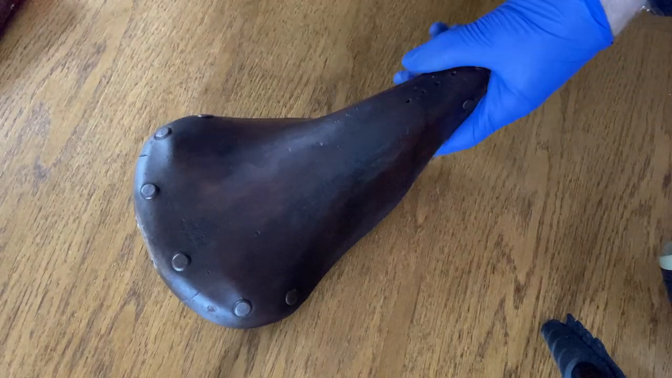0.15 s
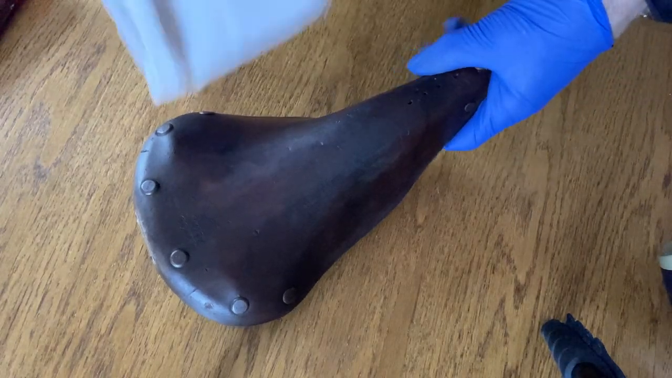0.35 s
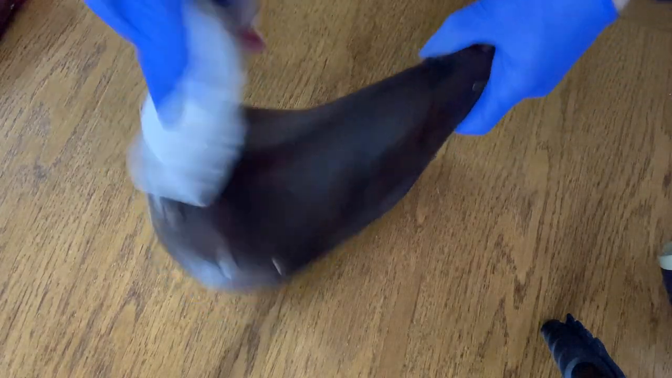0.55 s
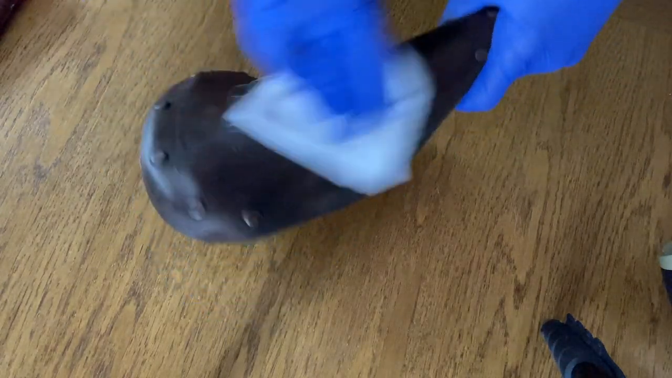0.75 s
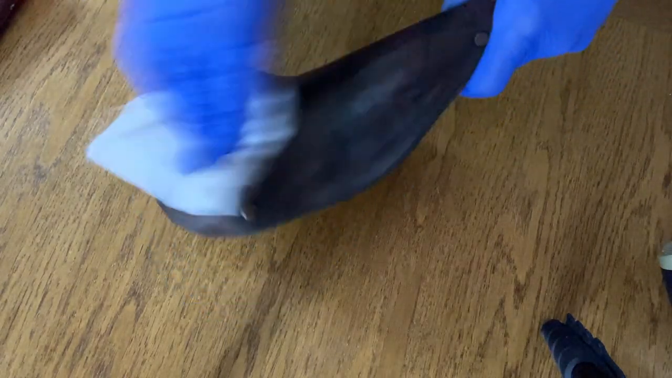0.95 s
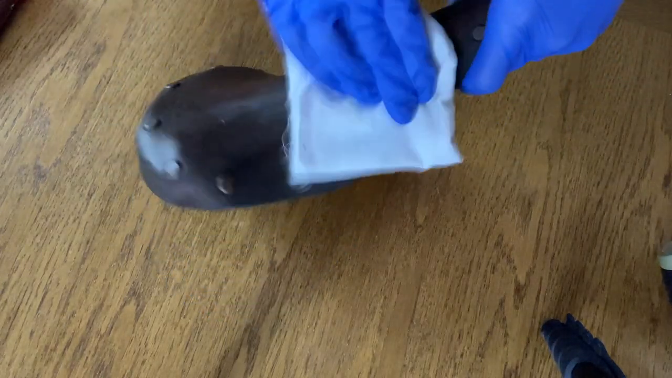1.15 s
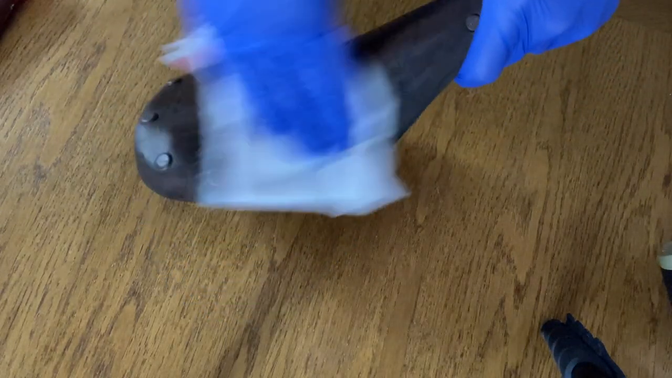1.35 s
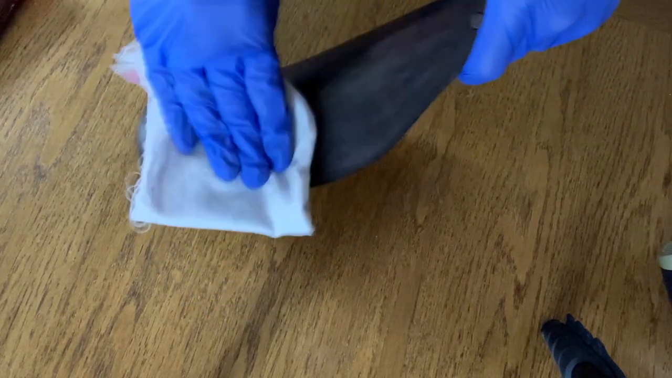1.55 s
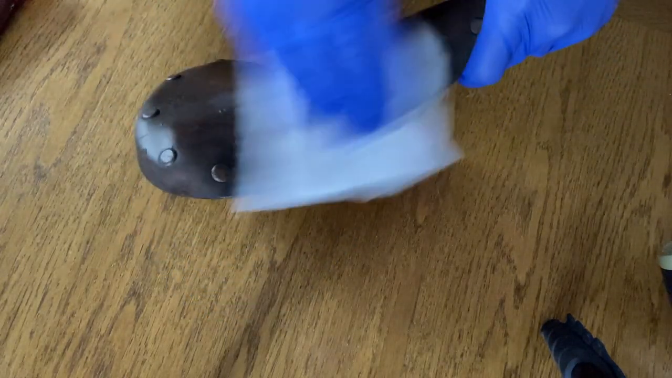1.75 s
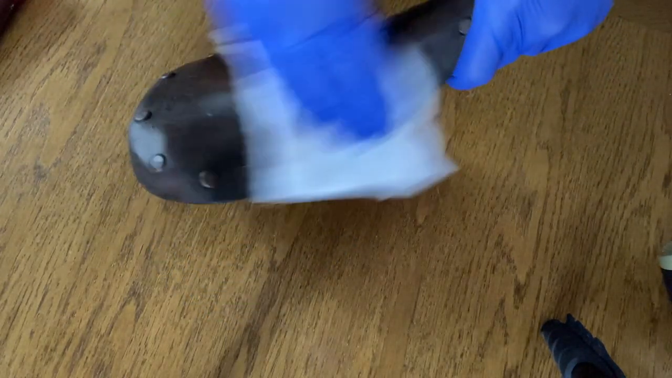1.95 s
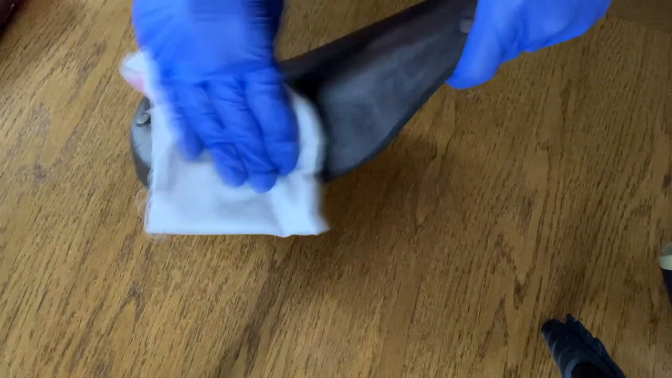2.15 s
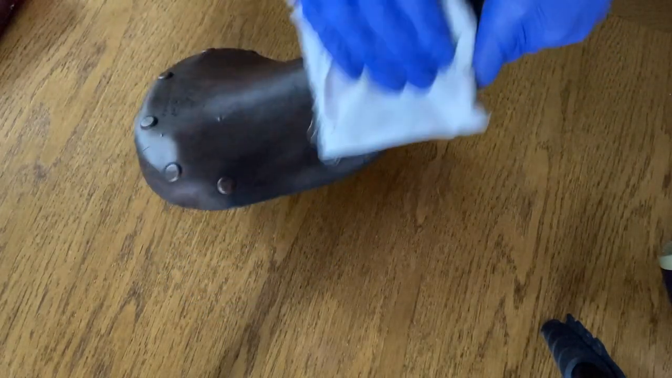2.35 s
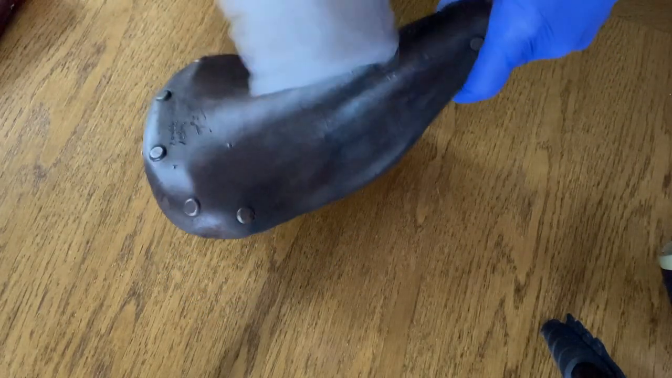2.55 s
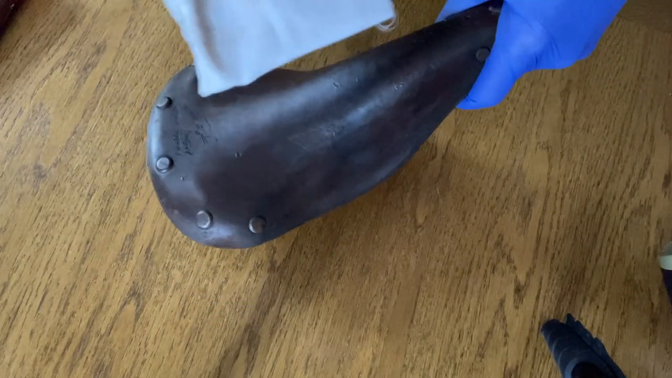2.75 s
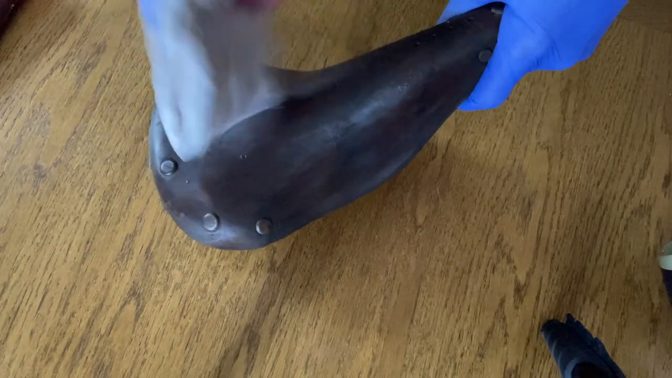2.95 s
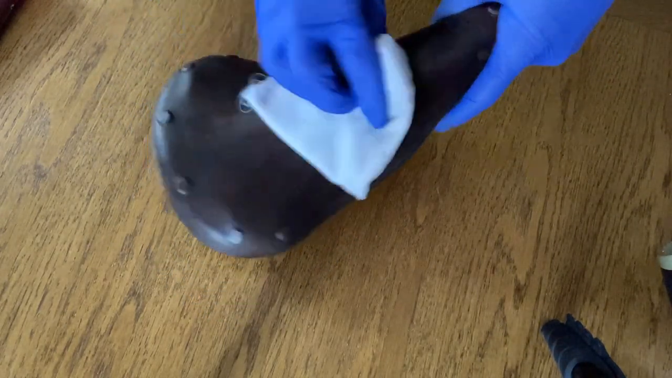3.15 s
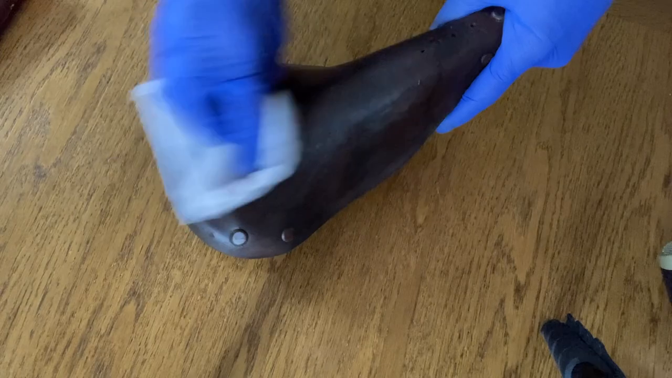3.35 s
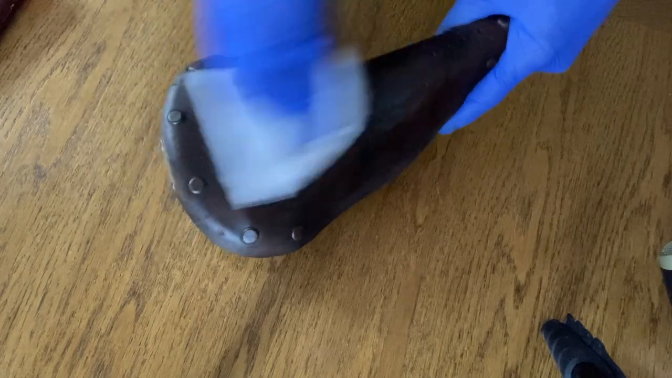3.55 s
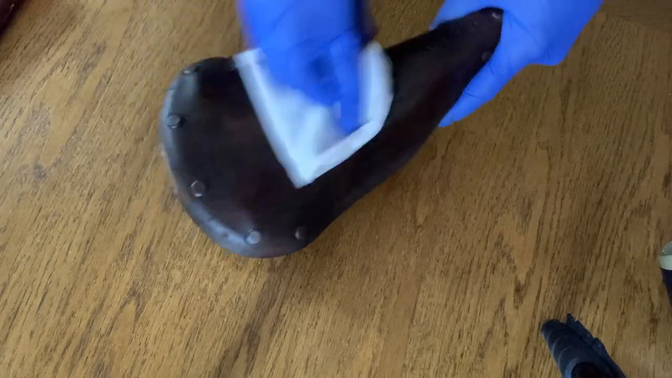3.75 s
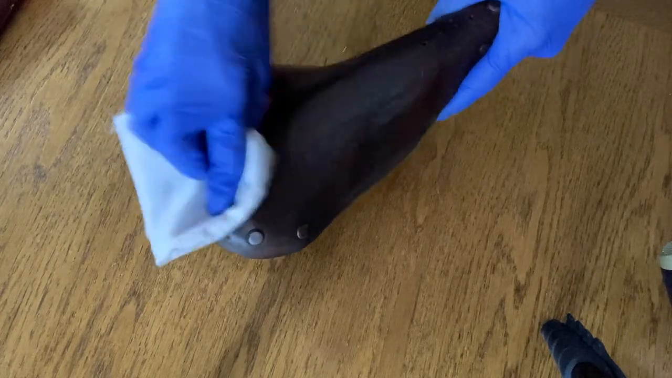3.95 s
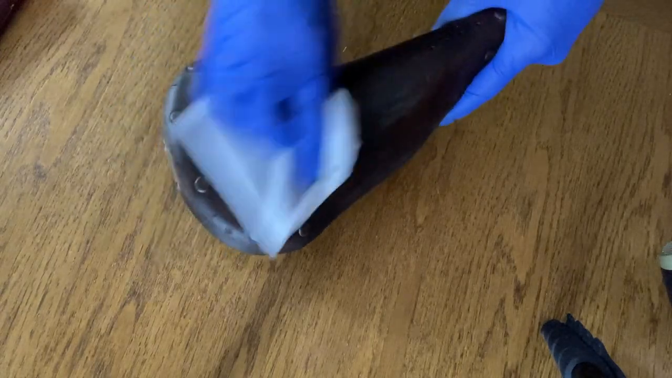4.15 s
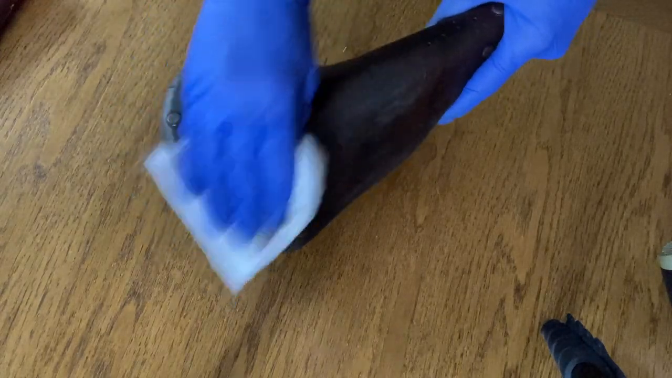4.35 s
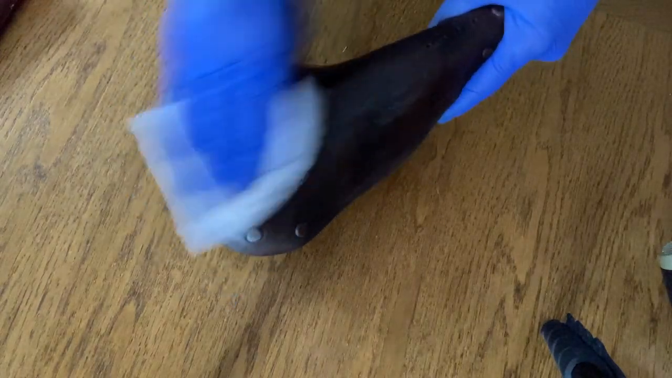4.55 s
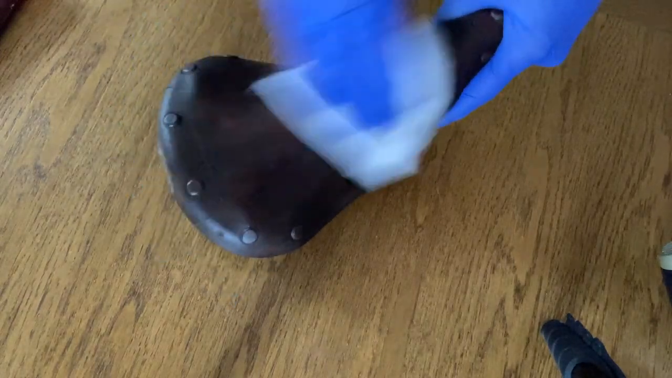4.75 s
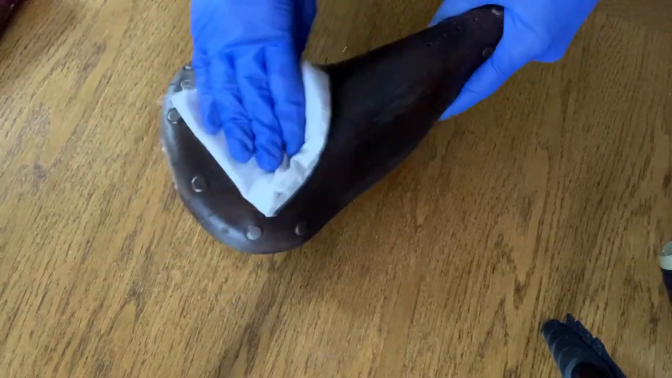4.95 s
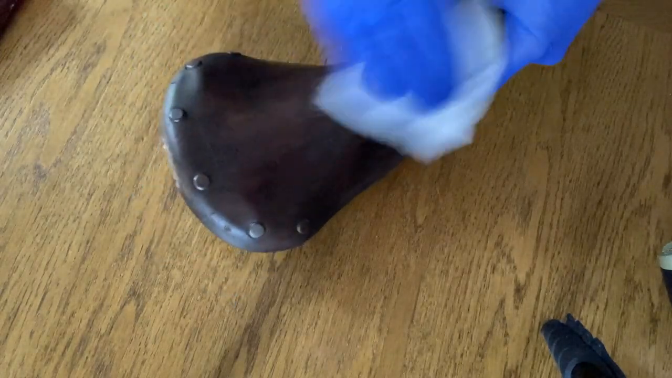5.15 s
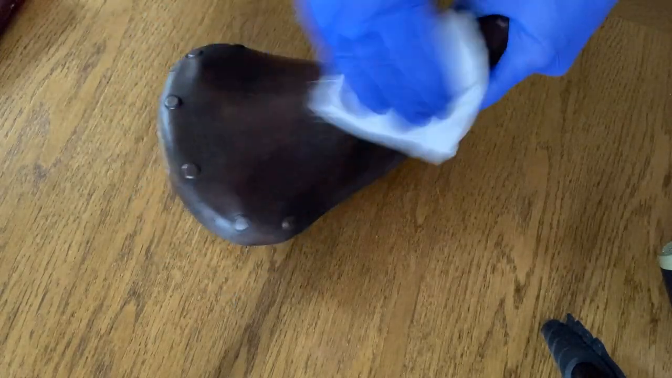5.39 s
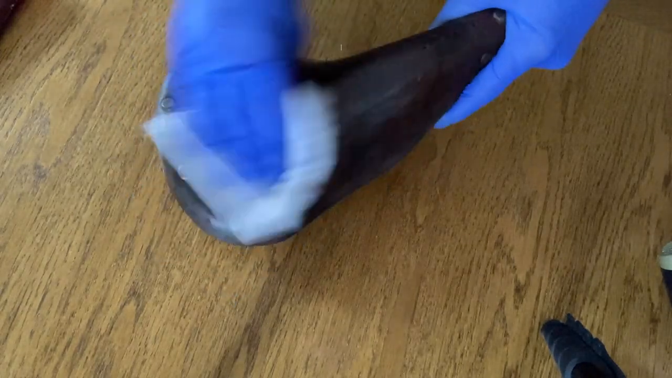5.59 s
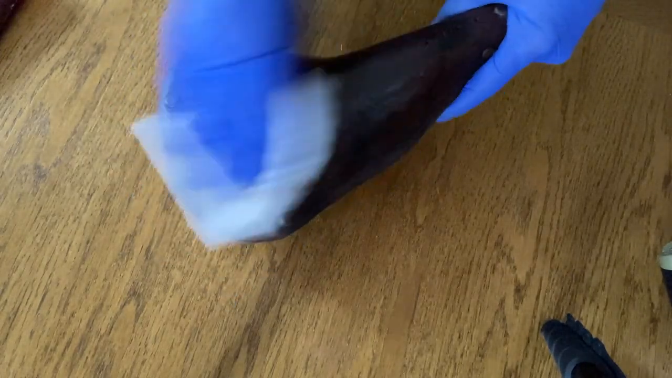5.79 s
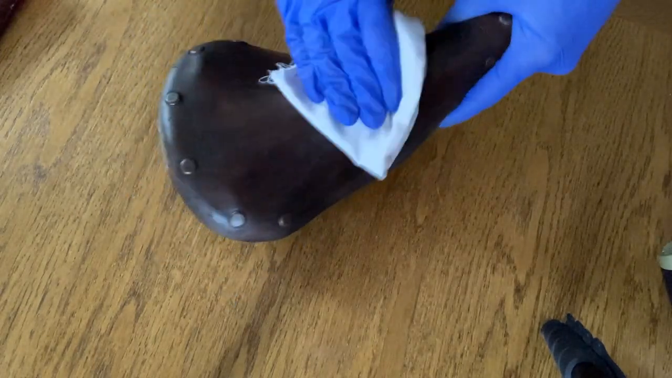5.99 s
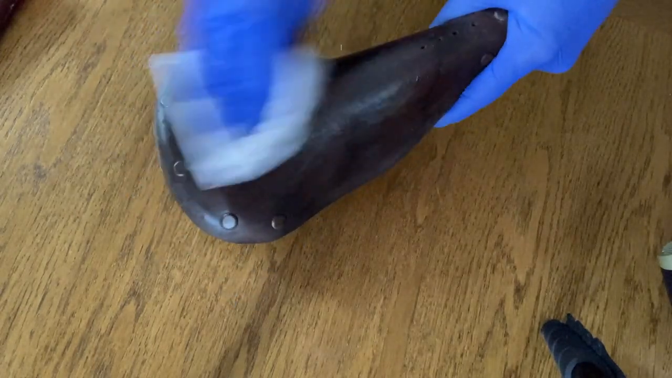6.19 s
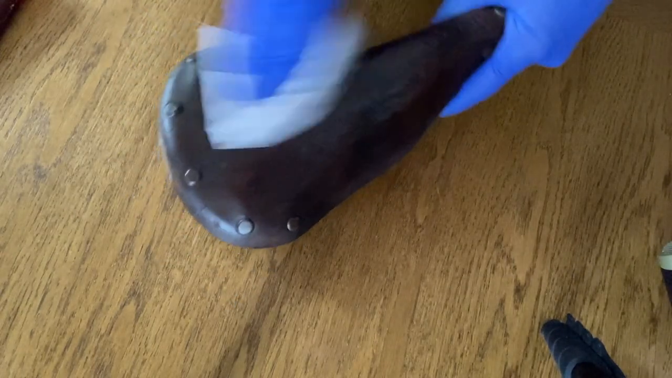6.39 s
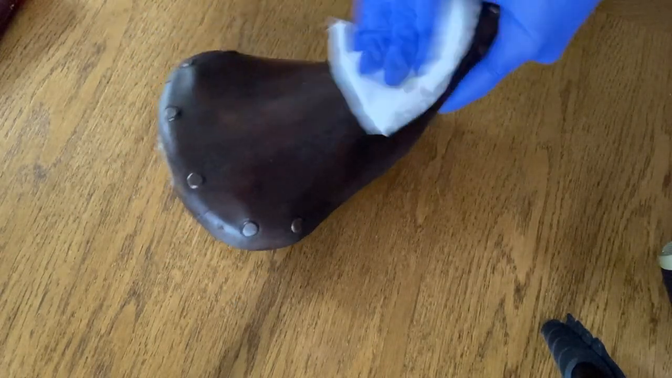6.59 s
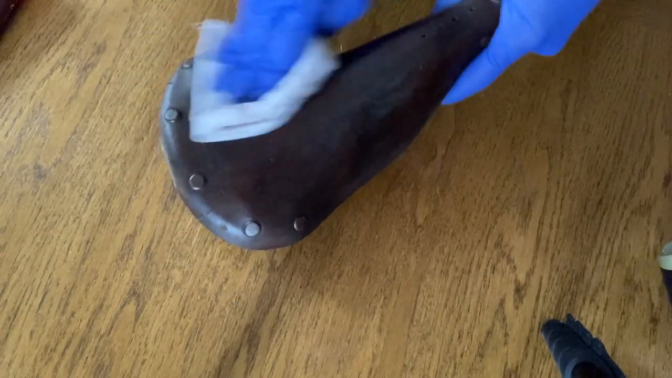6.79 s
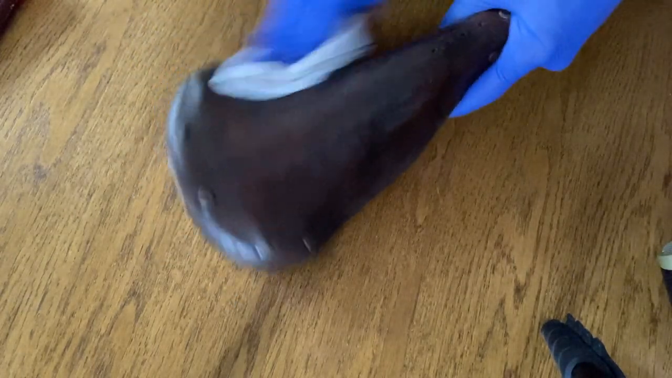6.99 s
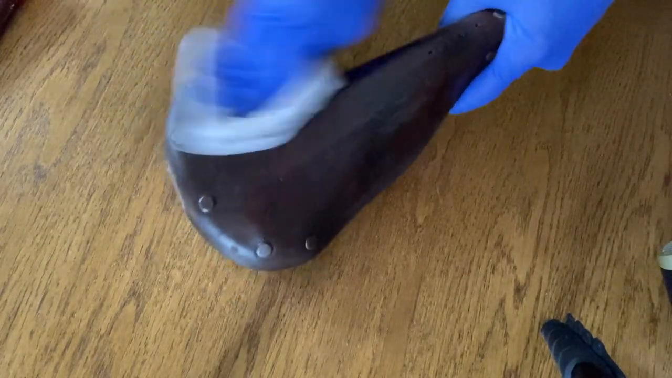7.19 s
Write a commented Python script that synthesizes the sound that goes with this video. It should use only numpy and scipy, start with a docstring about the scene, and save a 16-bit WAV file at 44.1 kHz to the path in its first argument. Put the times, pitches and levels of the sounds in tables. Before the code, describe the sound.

A cloth rubs a leather bicycle saddle in quick, close strokes while the saddle knocks now and then on a wooden table.

```python
"""Buffing a leather saddle.

A gloved hand rubs a bicycle saddle with a cloth, close by, about seven strokes a second.
Fibres hiss, threads rasp and the weave whirs up and down with each stroke; the leather creaks
at first contact. The saddle rocks, knocks and skids on a wooden table, its frame humming,
in a small quiet room."""
import sys
import numpy as np
from scipy import signal
from scipy.fft import rfft, irfft, next_fast_len
from scipy.io import wavfile
from scipy.ndimage import uniform_filter1d, map_coordinates

SR = 44100
rng = np.random.default_rng(int(sys.argv[2]) if len(sys.argv) > 2 else 0)


def inscribe(sig):
    """Save sig as 16-bit PCM at rate SR to the path in sys.argv[1].

    A 1-D sig is mono; a 2-D sig holds one channel per row.
    Samples are clipped to [-1, 1] before scaling.
    """
    pcm = np.round(np.clip(np.atleast_2d(sig).T, -1, 1) * 32767)
    wavfile.write(sys.argv[1], SR, pcm.astype(np.int16))


N = 318843
TIME_S = np.arange(N) / SR


def amp(db):
    """Decibels to gain."""
    return 10 ** (np.asarray(db) / 20)


def unit(x):
    """Scale to rms 1."""
    return x / np.sqrt(np.mean(x ** 2) + 1e-20)


def along(points, hz):
    """Interpolate (frequency [Hz], value) points on a log axis."""
    knots_hz, values = np.transpose(points)
    return np.interp(np.log(hz + 1), np.log(knots_hz + 1), values)


def wobble(rate_hz):
    """Smooth random curve, rms about 1."""
    knots = rng.standard_normal(int(N * rate_hz / SR) + 4)
    return map_coordinates(knots, [TIME_S * rate_hz])


def filtered(x, response):
    """Apply a frequency response."""
    size = next_fast_len(N + SR // 2)
    return irfft(rfft(x, size) * response(np.fft.rfftfreq(size, 1 / SR)), size)[..., :N]


def noise(spectrum):
    """Two independent noises of one spectrum."""
    return unit(filtered(rng.standard_normal((2, N)), lambda hz: amp(along(spectrum, hz))))


def add(track, start_s, sound):
    """Mix a sound into a track."""
    part = track[..., max(0, round(start_s * SR)):][..., :sound.shape[-1]]
    part += sound[..., :part.shape[-1]]


# Stereo width: (frequency [Hz], side gain [dB])
SIDE_GAIN = [(40, 13.5), (100, -5), (300, -6.5), (550, -1.5), (1100, -7.5), (2200, -5.5), (4200, -1.5),
             (6500, -17.5), (10000, -97)]

def spread(pair):
    """Two signals to left and right: wide in the bass and mids, centred in the high treble."""
    side = filtered(pair[1], lambda hz: amp(along(SIDE_GAIN, hz)))
    return np.array([pair[0] + side, pair[0] - side])


# Room tone: (frequency [Hz], relative level [dB])
ROOM_TONE_SPECTRUM = [(25, -18), (50, -11.5), (120, -5.5), (250, -25), (500, -29), (1500, -26.5),
                      (15000, -35.5)]

def room_tone(level_db=-77.5):
    """Faint steady background, mostly bass."""
    return amp(level_db) * spread(noise(ROOM_TONE_SPECTRUM))


# Leather resonances: (frequency [Hz], bandwidth [Hz], gain [dB])
SHELL_MODES = [(722, 65, 13), (1118, 217, 3), (1766, 53, 4.5), (3480, 640, -15), (4400, 150, -11)]

def shell(hz):
    """Response of the hollow leather shell."""
    return sum((-1) ** k * amp(db) * 1j * hz * width_hz / (mode_hz ** 2 - hz ** 2 + 1j * hz * width_hz)
               for k, (mode_hz, width_hz, db) in enumerate(SHELL_MODES))


# Drags and flicks of the cloth: (start [s], end [s], relative level [dB])
CLOTH_DRAGS = [(0, 0.025, -51), (0.097, .5, -68.5), (.34, .44, -64), (.53, .6, -62), (0.531, .55, -55),
               (0.594, 0.707, -56.5), (0.658, 0.673, -50.5), (2.363, 2.51, -60), (2.89, 3.06, -64.5),
               (2.989, 3.018, -62), (6.777, 7.23, -57)]
# Rustle: (frequency [Hz], relative level [dB])
RUSTLE_SPECTRUM = [(60, -3), (200, 3), (500, 4), (800, -6.5), (1200, -1.5), (1800, 1.5), (3000, -3),
                   (4200, -2), (9000, -1.5), (15500, -7)]

def loose_cloth(rise_db_per_s=124, fall_db_per_s=86, flick_s=.025, bright_db=-62, dull_hz=2300):
    """Cloth dragged without pressure rustles: each drag swells, holds and fades, duller when faint."""
    drags_db = []
    for start, end, db in CLOTH_DRAGS:
        briskness = 4 if end - start < flick_s else 1
        down_db = np.maximum(rise_db_per_s * (start - TIME_S), fall_db_per_s * (TIME_S - end))
        drags_db.append(db - briskness * np.maximum(down_db, 0))
    envelope_db = np.max(drags_db, axis=0)
    rustle = filtered(spread(noise(RUSTLE_SPECTRUM)), lambda hz: 1 + np.abs(shell(hz)))
    dull = filtered(rustle, lambda hz: 1 / (1 + (hz / dull_hz) ** 2))
    brightness = np.clip(amp(envelope_db - bright_db), 0, 1)
    return amp(envelope_db - 2 + 1.4 * wobble(120)) * (dull + brightness * (rustle - dull))


# Saddle bumps the table; the faint, long-ringing 0.575 s row is the frame humming under the rubbing: (time [s],
# relative level [dB], pitch [Hz], relative ring [dB])
BUMPS = [(0.347, -38.5, 191, -15), (.575, -50.5, 134, 8.5), (.636, -39.5, 135, -4), (.667, -39, 146, -3.5),
         (1.122, -33, 128, -1.5), (1.333, -28.5, 255, -31), (1.353, -21.5, 145, -11),
         (1.617, -36.5, 125, -11), (2.123, -49, 163, -2), (2.501, -46, 180, -9), (3.078, -29.5, 164, -11),
         (3.209, -18, 222.5, -12), (3.244, -32, 180, -13), (4.275, -32.5, 190, -18),
         (4.281, -38.5, 82.6, -16), (5.82, -40, 180, -12.5), (6.709, -38, 438, -9.5),
         (7.012, -30.5, 231, -12)]
# Tipped by a hard push, the saddle drops back on its rails: (time [s], relative level [dB])
DROPS = [(4.803, -24), (5.104, -26.5)]
# One drop: (delay [s], relative level [dB], pitch [Hz], relative ring [dB])
DROP_CONTACTS = [(0, -1, 714, -10.5), (.014, -2.5, 208, -11), (.023, -6.5, 106, -9),
                 (.026, -3.5, 222.2, -9.5)]

def contacts(clack_lead_s=.00202, clack_hz=560, clack_ring_db=-12):
    """All saddle-table contacts, as BUMPS rows; a clack leads each bump, far louder on hard ones."""
    clacks = [(s - clack_lead_s, 3.5 + 1.55 * db, clack_hz, clack_ring_db) for s, db, _, _ in BUMPS]
    drops = [(s + delay_s, db + contact_db, pitch_hz, ring_db)
             for s, db in DROPS for delay_s, contact_db, pitch_hz, ring_db in DROP_CONTACTS]
    return BUMPS + clacks + drops


# Saddle frame and table together: (frequency [Hz], relative level [dB], t60 [s])
FRAME_MODES = [(101, -1, 0.086), (133.6, 2, 0.55), (163.8, 0, 0.26), (206.7, -6.5, 0.5),
               (263.4, 7.5, 0.081), (283.3, -1.5, 0.27), (314, -1, 0.14), (336.4, -2.5, 0.39),
               (405, -11.5, 0.36), (524, -11, 0.45), (640, -17, 0.13), (744, 0.5, 0.096), (980, -17, 0.5),
               (1173, -5, 0.23)]

def knocks(t60_cycles=9, reach_octaves=.61, rattle_db=-15, rattle_t60_s=.13):
    """Each contact thuds and rattles; soft ones wake the low frame modes, hard ones the high."""
    track, t = np.zeros(N), np.arange(SR * 3 // 4) / SR
    mode_hz, mode_db, t60_s = np.transpose(FRAME_MODES)[:, :, None]
    for s, db, pitch_hz, ring_db in contacts():
        attack = 1 - np.exp(-t * pitch_hz * 1.88)
        thud = 1.28 * amp(-60 * t * pitch_hz / t60_cycles) * np.sin(2 * np.pi * pitch_hz * t)
        detuning = np.log2(mode_hz / pitch_hz) / reach_octaves
        drive = amp(mode_db + rng.normal(0, .52, mode_hz.shape)) / (1 + detuning ** 2) ** 1.63
        hum = np.sum(drive * amp(-60 * t / t60_s) * np.sin(2 * np.pi * mode_hz * t), axis=0)
        lowpass = signal.butter(3, min(2.2 * pitch_hz, 1500), fs=SR, output="sos")
        rattle = unit(signal.sosfilt(lowpass, rng.standard_normal(len(t))))
        rattle *= amp(rattle_db - 60 * t / rattle_t60_s)
        add(track, s, amp(db) * attack * (thud + amp(ring_db - 2) * hum + rattle))
    # The table top is too small to radiate deep bass.
    return signal.sosfilt(signal.butter(2, 70, "high", fs=SR, output="sos"), track)


# Leather catches and lets go: (time [s], relative level [dB])
LEATHER_SLIPS = [(.414, -55), (.4405, -49.5), (.4625, -52), (.5065, -49.5), (.552, -49.5), (1.8545, -47),
                 (2.118, -43.5), (3.967, -45), (4.0992, -44), (5.4145, -46)]

def creaks(attack_s=.00079, t60_s=.04, scrape_db=-11, scrape_hz=4500):
    """Each slip is a short scrape that rings the leather shell."""
    track, t = np.zeros((2, N)), np.arange(SR // 10) / SR
    for s, db in LEATHER_SLIPS:
        envelope = amp(db + 12 - 60 * t / t60_s) * (1 - np.exp(-t / attack_s))
        add(track, s, envelope * rng.standard_normal((2, len(t))))
    return spread(filtered(track, lambda hz: shell(hz) + amp(scrape_db) / (1 + 1j * hz / scrape_hz) ** 2))


# Even strokes until the next row, 0 for a pause: (start [s], strokes [count])
STROKE_RUNS = [(.68, 4), (1.27, 6), (2.135, 1), (2.352, 0), (3.035, 1), (3.16, 4), (3.778, 2), (4.095, 1),
               (4.3, 2), (4.626, 1), (4.812, 8), (5.988, 5), (6.758, 1), (6.912, 2), (7.3, 0)]

def hand(usual_stroke_s=.148, skew=.93):
    """Pendulum motion: swing (peak 1 per stroke), speed (peak 1 if usual), direction (push 1, pull -1)."""
    swing, speed, direction = np.zeros((3, N))
    sign = -1
    for (first, strokes), (last, _) in zip(STROKE_RUNS, STROKE_RUNS[1:]):
        turns_s = np.linspace(first, last, round(strokes) + 1)
        for start, end in zip(turns_s, turns_s[1:]):
            sign = -sign
            now = (TIME_S >= start) & (TIME_S < end)
            progress = (TIME_S[now] - start) / (end - start)
            swing[now] = np.abs(np.sin(np.pi * progress ** skew))
            speed[now] = swing[now] * usual_stroke_s / (end - start)
            direction[now] = sign
    return swing, speed, direction


# Firmness of the rub: (time [s], relative pressure [dB], relative rasp level [dB])
HAND_EFFORT = [(0.74, -59.5, -61), (0.9, -52.5, -55), (1.5, -52.5, -51.5), (2.07, -51, -49.8),
               (2.25, -56, -54), (3.1, -55, -57), (3.55, -51.5, -53.5), (4.2, -55.5, -58),
               (4.55, -54.5, -58), (4.72, -49.5, -50.5), (5.35, -50.5, -50.5), (5.85, -49.5, -48),
               (6.2, -52.5, -53.0), (6.68, -51.0, -52.7), (6.85, -56.5, -58), (7.2, -58, -62.5)]

def pressing(direction, weave_follow=.12, push_db=.88):
    """Gains of hiss, rasp and weave under the hand's pressure; the weave bites harder on the push."""
    times_s, *columns = np.transpose(HAND_EFFORT)
    pressure_db, rasp_db = (np.interp(TIME_S, times_s, column) for column in columns)
    weave_db = -53 + weave_follow * (pressure_db - pressure_db.mean()) + push_db * direction
    gains = amp([pressure_db, rasp_db, weave_db]) * np.abs(direction)
    return uniform_filter1d(gains, SR // 30, axis=1)


# Weave roughness at mid-stroke pace: (frequency [Hz], relative level [dB])
WEAVE_SPECTRUM = [(100, -26), (300, -7), (600, -6.5), (1100, 2.5), (1600, 0), (2000, -1.5), (2600, 2),
                  (4000, -10), (8000, -59)]
# Saddle body response: (frequency [Hz], relative gain [dB])
BODY_RESPONSE = [(60, -22), (140, 16), (300, 3), (450, -8), (600, -5.5), (730, -3), (880, -8), (1300, -2.5),
                 (1700, -1), (2400, -7), (6000, -41)]

def weave(swing, gain, slowest_pace=.33, grit_db=4, trim_db=-3.2):
    """The weave is a rough track read at the pace of the swing: its whir rises and falls each stroke."""
    pace = np.abs(slowest_pace + (1 - slowest_pace) * swing) * amp(.7 * wobble(9))
    travel = np.cumsum(pace)
    whir = np.array([map_coordinates(track, [travel], mode="wrap") for track in noise(WEAVE_SPECTRUM)])
    whir = filtered(whir, lambda hz: amp(along(BODY_RESPONSE, hz)) * (1 + amp(-4) * np.abs(shell(hz))))
    pressure_db = 1.8 * wobble(30)
    grip = unit(amp(grit_db * wobble(260) + pressure_db))
    envelope = amp(trim_db) * gain * (.1 + .9 * swing ** .4)
    return envelope * grip * spread(unit(whir))


# Fibre hiss: (frequency [Hz], relative level [dB])
HISS_SPECTRUM = [(150, -53), (500, -12), (1500, -4.5), (3000, -13), (4700, -10), (6600, -6), (8800, -3),
                 (12900, -6.5), (15500, -9.5)]

def hiss(swing, gain, air_hz=7000, trim_db=3):
    """Countless fibres flick over the leather, loudest and brightest in mid-stroke."""
    full = spread(noise(HISS_SPECTRUM))
    soft = filtered(full, lambda hz: 1 / (1 + (hz / air_hz) ** 2))
    grit = unit(amp(-.2 * wobble(900) + 1.64 * wobble(45)))
    brightness = .3 + .66 * swing ** .63
    envelope = amp(trim_db) * gain * (.21 + .79 * swing ** 1.5)
    return envelope * grit * (soft + brightness * (full - soft))


def fibre_snaps(swing, peak_rate_hz=500, scatter_db=5):
    """Single fibres catch and let go, most often in mid-stroke."""
    caught = rng.random(N) < peak_rate_hz * swing / SR
    return unit(caught * rng.choice([-1, 1], N) * amp(scatter_db * rng.standard_normal(N)))


# Thread rasp: (frequency [Hz], relative level [dB])
RASP_SPECTRUM = [(500, -5.5), (1500, -1), (2400, 1.5), (3100, -0.5), (3900, 2.5), (4700, 1.5), (6000, -4.5),
                 (9000, -33)]

def rasp(swing, gain, snap_db=-11, trim_db=-1.75):
    """Threads bite into the grain of the leather where the fingers press."""
    grit = unit(amp(.36 * wobble(650) + 3.5 * wobble(45)))
    snaps = unit(filtered(fibre_snaps(swing), lambda hz: amp(along(RASP_SPECTRUM, hz))))
    envelope = amp(trim_db) * gain * (.37 + .63 * swing)
    return envelope * (grit * spread(noise(RASP_SPECTRUM)) + amp(snap_db) * snaps)


# Taut weave crosses an edge: (centre [s], relative level [dB])
EDGE_ZIPS = [(1.868, -59), (4.15, -50.5), (4.39, -47), (4.53, -49.5), (4.691, -53.5), (5.6, -55),
             (5.735, -51), (5.88, -53), (6.024, -49), (6.165, -52), (6.65, -53)]

def zips(speed, gain, rest_hz=400, usual_hz=2147, octave_db=-9, half_width_s=.018):
    """Evenly spaced threads give a noise band and its octave, gliding with speed, swelling at edges."""
    def blur():
        return np.array([wobble(800) + .46 * wobble(1400) for _ in range(2)])

    def band(angle):
        return blur() * np.cos(angle) + blur() * np.sin(angle)

    thread_hz = rest_hz + (usual_hz - rest_hz) * speed * amp(.97 * wobble(25))
    phase = 2 * np.pi * np.cumsum(thread_hz) / SR
    edges = sum(amp(db - 3) * np.exp(-((TIME_S - s) / half_width_s) ** 2) for s, db in EDGE_ZIPS)
    strokes = amp(-11 + 3.2 * wobble(14)) * gain * np.sqrt(speed)
    return spread((edges + strokes) * (band(phase) + amp(octave_db) * band(2 * phase)))


# Saddle skids on the table: (centre [s], half width [s], relative level [dB], pitch [Hz])
RAIL_SKIDS = [(2.522, 0.034, -55, 140), (6.54, 0.28, -59, 218), (7.041, 0.084, -47, 274)]

def skids(reach_octaves=1.25, judder_db=2):
    """The rails judder over the wood: a low scuff that swells and fades."""
    track = np.zeros(N)
    for s, half_width_s, db, pitch_hz in RAIL_SKIDS:
        scuff = filtered(rng.standard_normal(N),
                         lambda hz: 1 / (1 + (np.log2((hz + 1) / pitch_hz) / reach_octaves) ** 2) ** 2)
        track += amp(db) * np.exp(-((TIME_S - s) / half_width_s) ** 2) * unit(scuff)
    return track * unit(amp(judder_db * wobble(70)))


# Ticks on rivets and rails: (time [s], relative level [dB], pitch [Hz])
METAL_TICKS = [(3.0639, -25, 5860), (4.275, -48, 6200), (5.8154, -19, 3950), (5.8181, -33, 4030)]

def ticks(t60_s=.0017):
    """Tiny hard contacts with almost no ring."""
    track, t = np.zeros(N), np.arange(SR // 50) / SR
    for s, db, hz in METAL_TICKS:
        click = 1.3 * np.sin(2 * np.pi * hz * t) + .38 * rng.standard_normal(len(t))
        add(track, s, amp(db - 60 * t / t60_s) * click)
    return track


def early_reflections(x, echo_db=-6, earliest_s=.002025, latest_s=.022, count=14):
    """Direct sound plus quick reflections from the table, arms and walls."""
    delays_s = rng.uniform(earliest_s, latest_s, count)
    gains = rng.standard_normal(count)
    gains *= amp(echo_db) / np.linalg.norm(gains)
    track = x.copy()
    for delay_s, gain in zip(delays_s, gains):
        add(track, delay_s, gain * x)
    return track


# Room decay: (frequency [Hz], t60 [s])
ROOM_DECAY = [(100, 0.74), (350, 0.68), (1000, 0.41), (4000, 1), (12000, 0.044)]

def reverb(x, predelay_s=.006):
    """Two diffuse room tails, each band dying at its own rate."""
    hz, t, bands = signal.stft(rng.standard_normal((2, SR * 3 // 4)), SR, nperseg=256)
    decay = amp(-60 * t / along(ROOM_DECAY, hz)[:, None])
    _, tail = signal.istft(bands * decay, SR, nperseg=256)
    delayed = np.pad(x, (round(predelay_s * SR), 0))
    return signal.fftconvolve(delayed[None], tail / np.linalg.norm(tail[0]), axes=1)[:, :N]


def scene():
    """Rubbing and knocks slightly to the right, with the room behind them."""
    swing, speed, direction = hand()
    hiss_gain, rasp_gain, weave_gain = pressing(direction)
    leather = (weave(swing, weave_gain) + zips(speed, rasp_gain) + creaks()) * amp([[-1], [.8]])
    rubbing = early_reflections(leather + rasp(swing, rasp_gain) * amp([[-.5], [.4]]))
    cloth = hiss(swing, hiss_gain) + loose_cloth()
    blows = knocks() + skids()
    # Keep the saddle's low hum dry and clear; only the higher part of the knocks echoes.
    echo = reverb(filtered(blows, lambda hz: (1j * hz / (1j * hz + 188)) ** 2))
    table = (blows + amp(-7) * spread(echo)) * amp([[-1.5], [1.2]])
    return rubbing + cloth + ticks() + table + amp(-9) * reverb(leather.mean(axis=0)) + room_tone()


def record(dry):
    """Thin the deep bass and cut the extreme treble."""
    highpass_hz, top_hz = 35, 15850
    return filtered(dry, lambda hz: (hz < top_hz) * 1j * hz / (1j * hz + highpass_hz))


dry = scene()
out = record(dry)
inscribe(out)
```